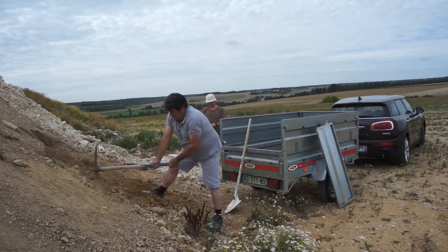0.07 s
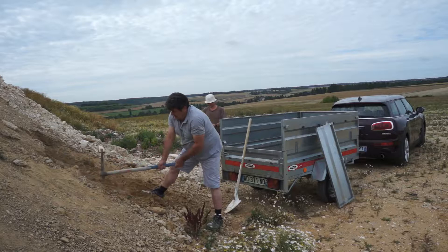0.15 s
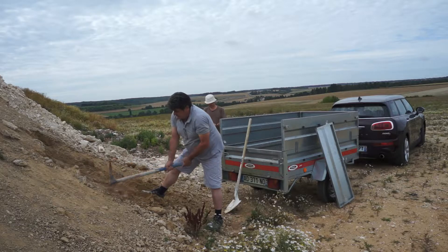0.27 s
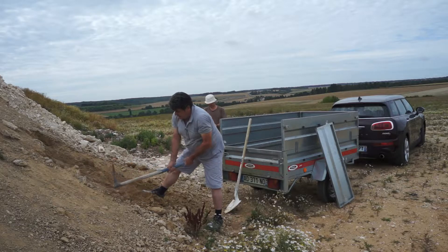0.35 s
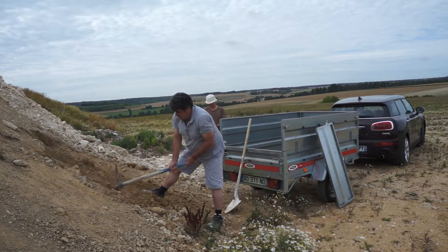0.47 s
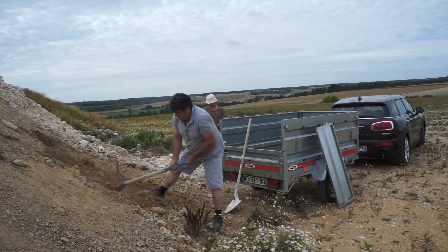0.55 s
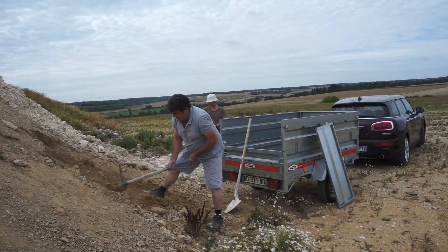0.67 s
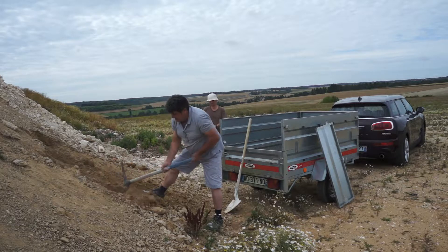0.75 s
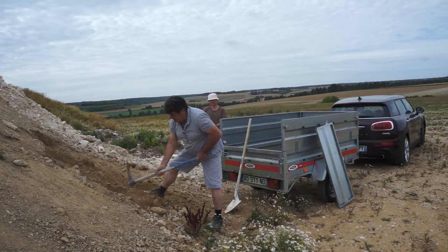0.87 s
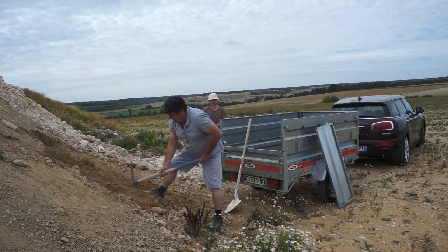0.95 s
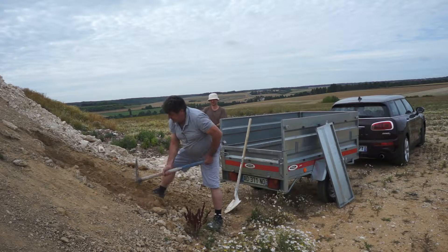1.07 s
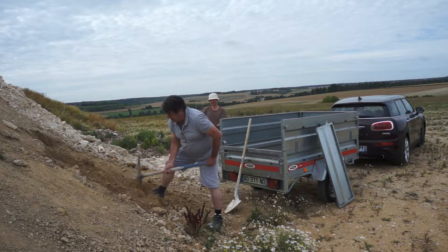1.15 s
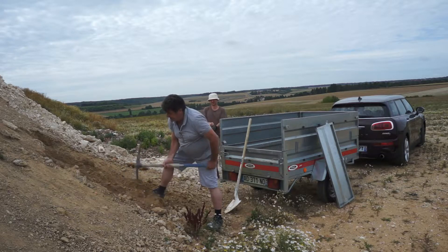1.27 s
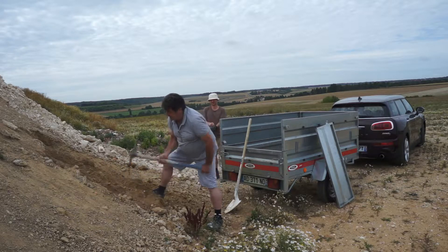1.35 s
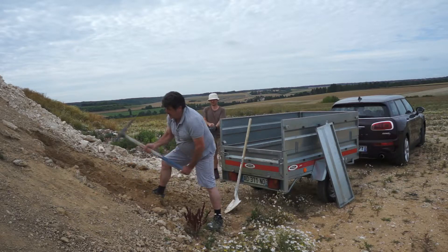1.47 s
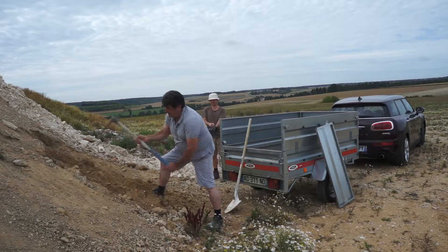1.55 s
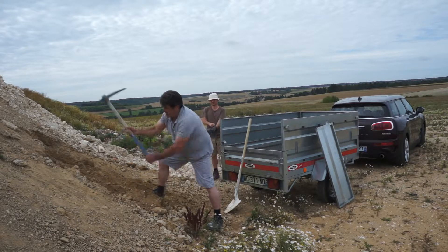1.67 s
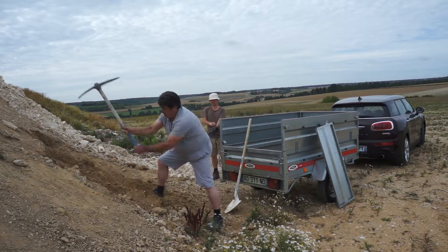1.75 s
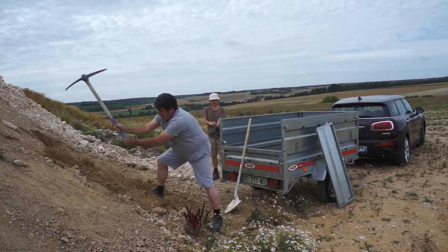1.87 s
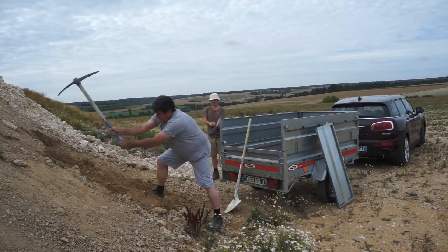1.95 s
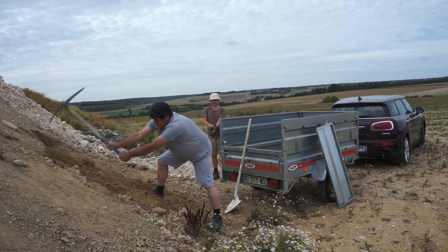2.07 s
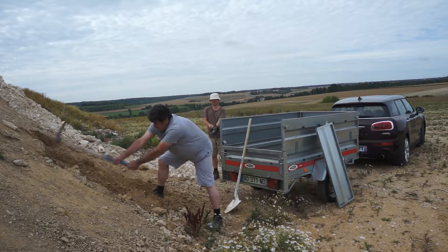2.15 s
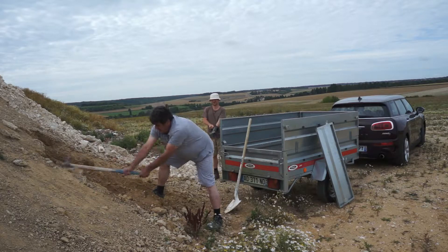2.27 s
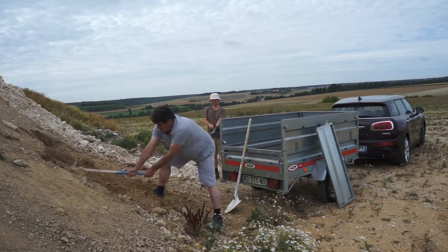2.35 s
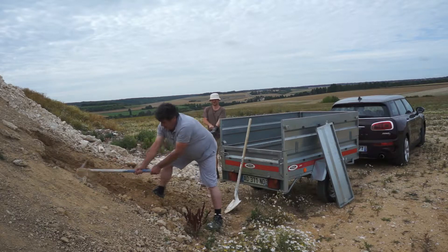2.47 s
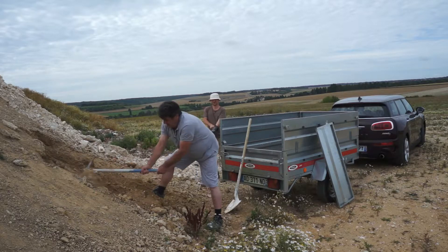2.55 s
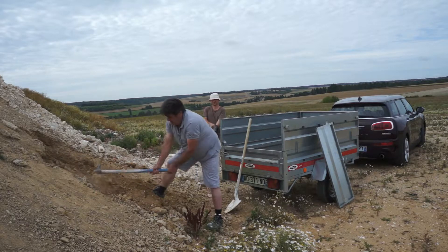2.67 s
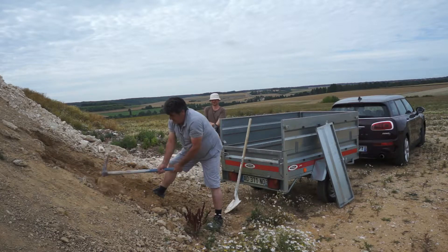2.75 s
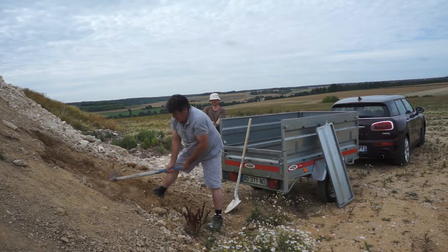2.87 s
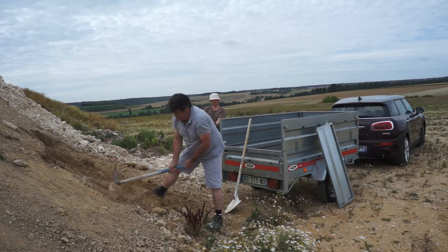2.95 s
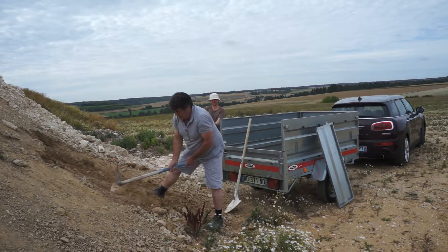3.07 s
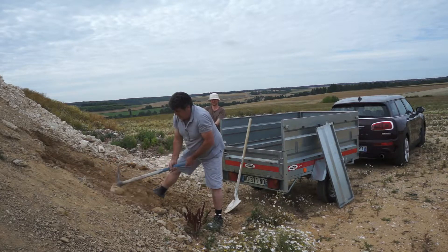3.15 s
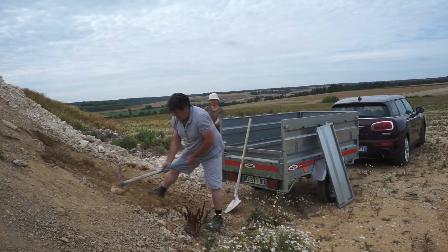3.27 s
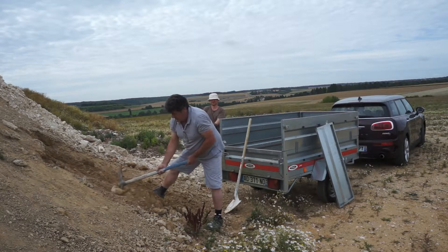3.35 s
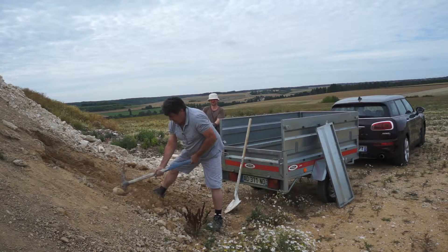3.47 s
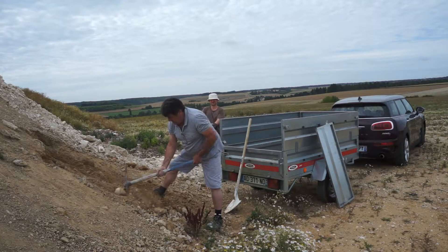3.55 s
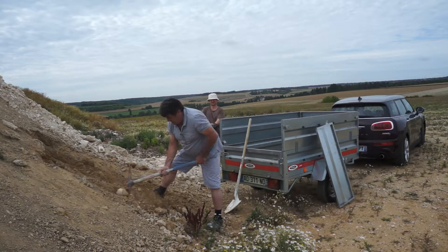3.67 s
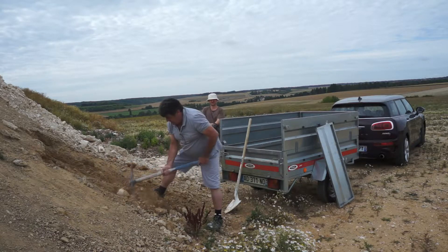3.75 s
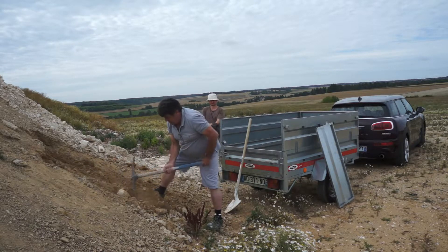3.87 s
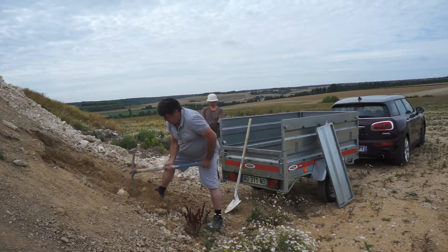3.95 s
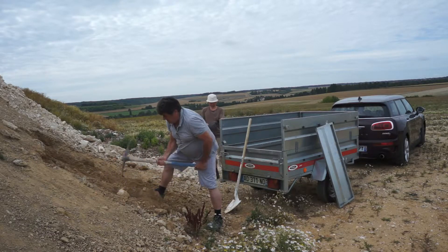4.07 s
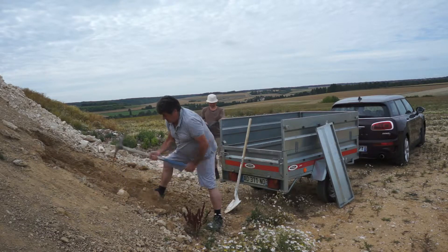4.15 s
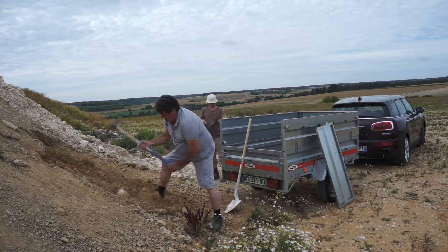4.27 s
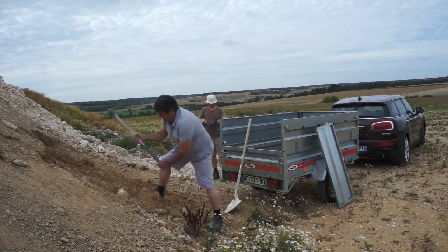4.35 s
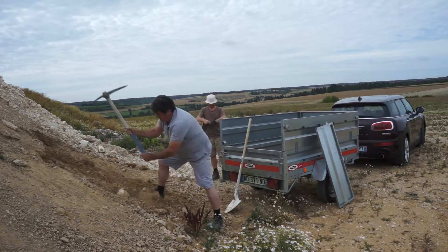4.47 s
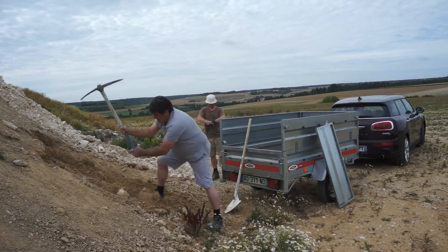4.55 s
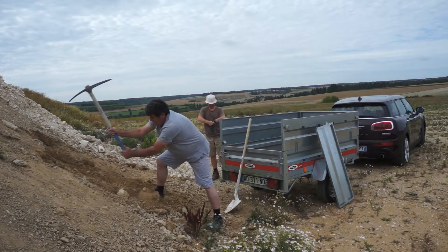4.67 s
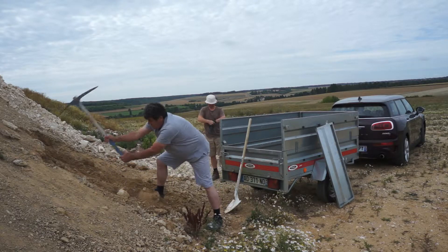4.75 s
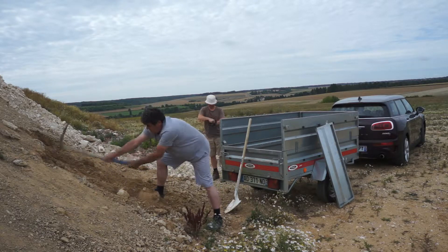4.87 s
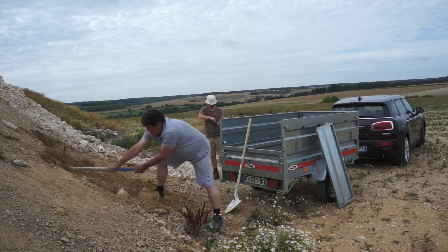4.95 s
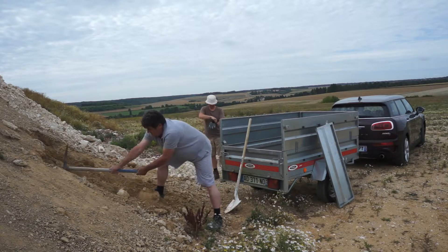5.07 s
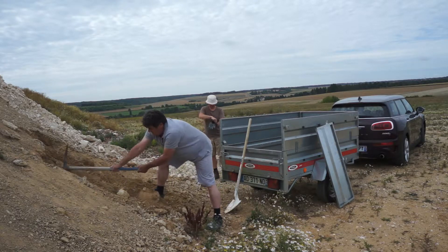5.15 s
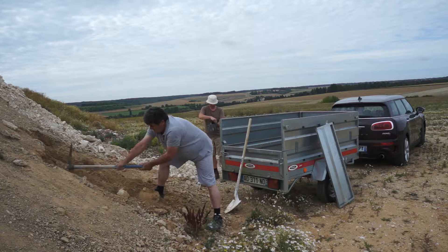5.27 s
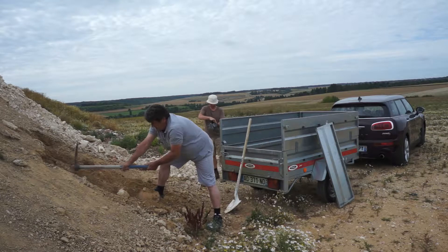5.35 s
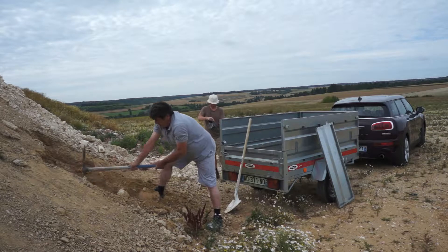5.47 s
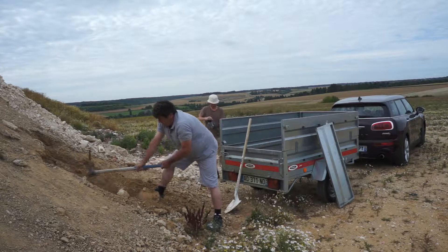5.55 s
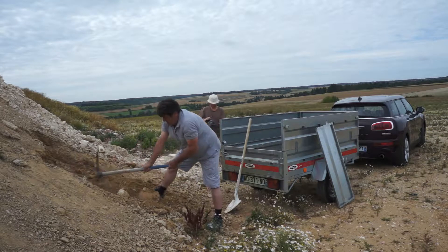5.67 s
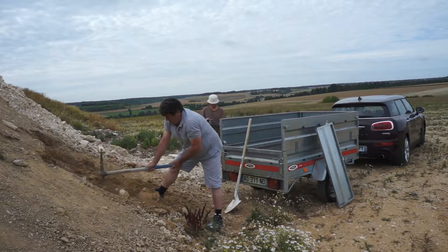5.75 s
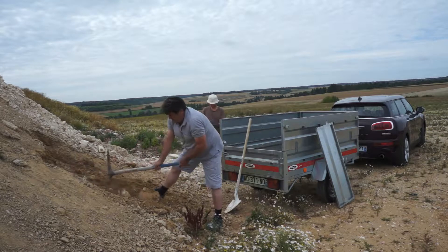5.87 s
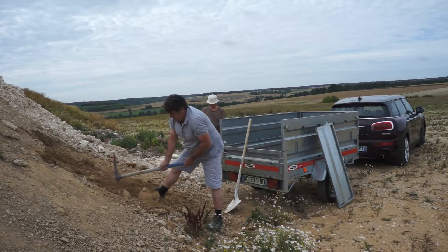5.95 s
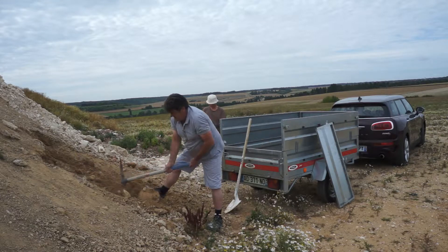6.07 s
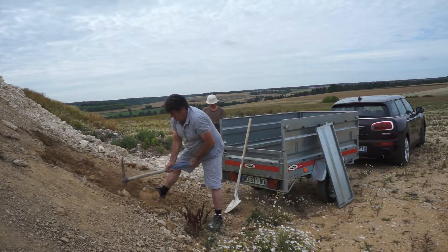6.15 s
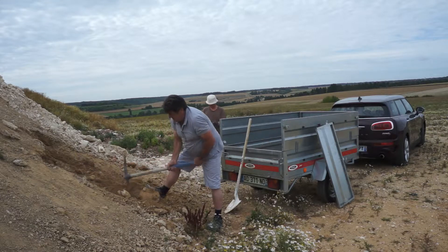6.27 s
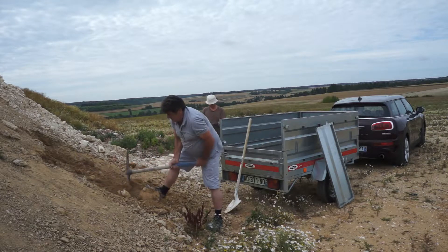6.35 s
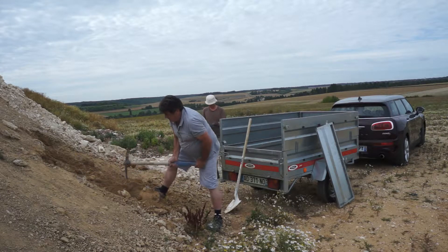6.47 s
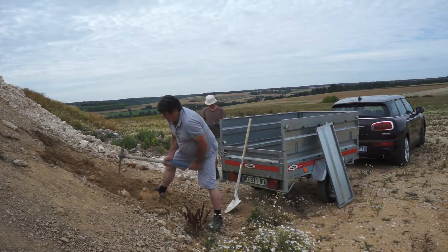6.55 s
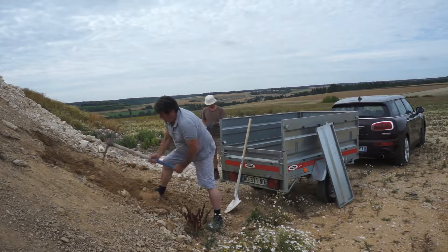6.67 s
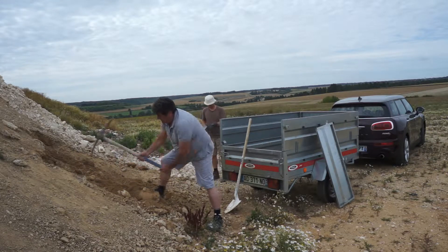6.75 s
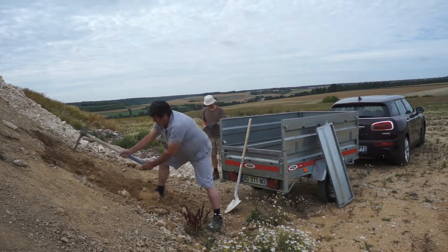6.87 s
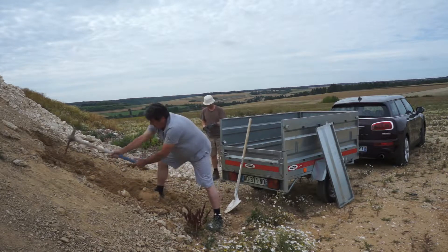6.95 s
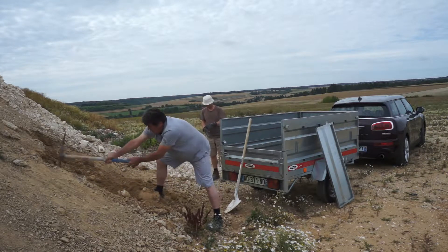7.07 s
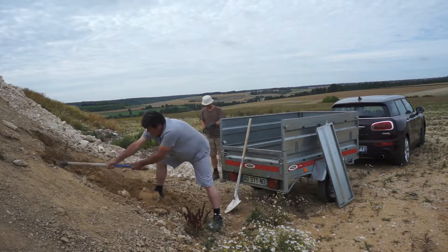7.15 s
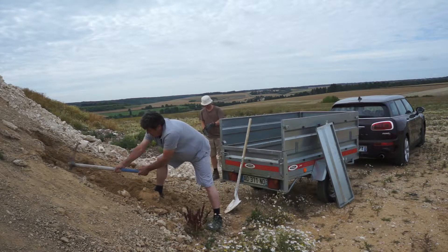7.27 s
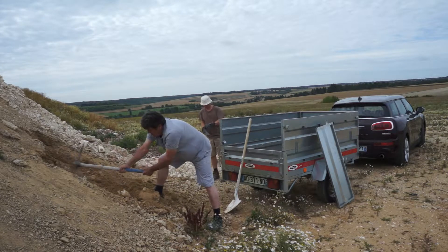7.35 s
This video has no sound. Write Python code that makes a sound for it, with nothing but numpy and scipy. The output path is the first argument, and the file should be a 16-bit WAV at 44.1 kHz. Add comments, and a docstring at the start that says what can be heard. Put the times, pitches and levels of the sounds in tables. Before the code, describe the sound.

Steel pick digging stony earth: gritty scrapes, sharp crunching strikes, clinks as it is levered free, low wind buffets and faint distant birds.

```python
"""Soil trickles, stones tick and a steel point scrapes gravel; then a pick hits a stony bank in open farmland.
Two blows are hard and one is light; between them the pick is levered free, clinking and dropping stones.
Ground sounds are filtered noise and grain impacts; the steel is a bank of decaying modes driven by the same forces.
Gusts (low noise) buffet the microphone; small birds (gliding sines) call far away over faint open air."""
import sys
import numpy as np
from scipy import signal
from scipy.fft import rfft, irfft
from scipy.io import wavfile
from scipy.ndimage import uniform_filter1d

SR = 44100
rng = np.random.default_rng(int(sys.argv[2]) if len(sys.argv) > 2 else 0)


def unload_wav(signal):
    """Save mono or channel-first audio to the path in sys.argv[1] as 16-bit WAV at rate SR, clipped to [-1, 1]."""
    wavfile.write(
        sys.argv[1],
        SR,
        np.round(np.clip(np.atleast_2d(signal).T, -1, 1) * 32767).astype(np.int16),
    )


N = 326340
TIME_S = np.arange(N) / SR

# blows: (time [s], crack [dB], thud [dB], crunch [dB], time to rest [s], stone hardness tilt [dB/octave],
#         steel ring re ground [dB])
BLOWS = [(2.2386, -24.5, -31, -38.3, 0.042, -1.2, -6), (4.9372, -25, -69, -39.3, .062, 6.5, -1),
         (7.0928, -62, -54, -58.5, 0.1, -4, 2)]
# pick modes: (frequency [Hz], t60 [s], level when the point bites [dB], level when knocked side-on [dB])
STEEL_MODES = [(612, 0.16, -16, 0.5), (983, 0.11, -10, -15), (1443, 0.076, 0.5, 4), (1988, 0.056, 2, -16),
               (2154, 0.049, 7.5, -9.5), (2557, 0.093, -4, 4.5), (2700, 0.033, 7.5, -34),
               (3980, 0.025, 10, -10), (4810, 0.064, -2, -12.5), (5500, 0.05, -3, -22),
               (7770, 0.044, 3, -20), (8000, 0.064, 6, -16), (9160, 0.02, 5.5, -16),
               (10784, 0.029, 6.5, -37)]
# breaking ground, relative spectrum: (frequency [Hz], density [dB/Hz])
EARTH = [(60, -41), (150, -6), (290, 3.5), (550, 1.5), (1200, -2), (2400, -2.5), (3400, -9), (5200, -9),
         (6300, -15.5), (9000, -9), (11000, -20)]
# shoved soil, filter: (frequency [Hz], gain [dB])
SHOVED_SOIL = [(30, -38), (120, -2), (280, 1), (600, 2)]
# head against stone: (time [s], peak [dB], contact cut-off [Hz])
CLINKS = [(.362, -50.5, 2500), (2.627, -49.5, 10000), (2.658, -41.5, 11300), (2.7267, -33, 12500),
          (2.775, -29, 3800), (5.3178, -50.5, 9500), (6.454, -46, 2010), (6.4758, -45, 1890),
          (6.4997, -55.5, 1820)]
# stones that snap or drop, and one narrow steel ping at the second blow:
# (time [s], level [dB], centre [Hz], spread [octaves])
TICKS = [(0.155, -53, 3330, 0.77), (.221, -52, 2600, 1), (1.348, -49.5, 5470, 0.75),
         (1.528, -53, 2050, 0.85), (2.077, -55, 2100, 0.36), (2.3705, -46.5, 850, 0.85),
         (2.7254, -44.5, 3500, 2), (2.8408, -45, 2510, 0.64), (2.9834, -53, 2500, 0.47),
         (3.8243, -54.5, 1490, 1.1), (3.878, -45.5, 1870, 0.75), (4.3226, -43.5, 4000, 0.67),
         (4.3507, -48, 3280, 0.82), (4.3668, -46, 4500, 0.61), (4.429, -43.5, 3540, 0.6),
         (4.938, -31.5, 3980, 0.11), (4.955, -43, 420, 0.47), (4.999, -41, 466, 0.82),
         (5.2535, -48.5, 2300, 0.83), (5.315, -49.5, 2540, 0.82), (5.5262, -52.5, 2900, 0.69),
         (5.7694, -50.5, 3020, 0.59), (5.7958, -43, 1680, 1.08), (6.234, -58, 555, 0.26),
         (6.4406, -43.5, 2340, 0.3), (6.531, -45.5, 750, 0.79), (6.604, -45, 1200, 0.69),
         (6.984, -52, 607, 0.96), (7.0929, -49, 1100, 0.79), (7.1006, -70, 480, 1)]
# point across a buried stone: (time of height [s], half length [s], level [dB], steel ring re ground [dB])
SKIDS = [(0.343, 0.018, -52, 11), (0.393, 0.01, -58, 7), (4.962, .005, -39, 2), (7.149, 0.01, -57, 10)]
# short rasps, broad ones of crushed stone, narrow ones of the steel ringing near 2 kHz:
# (time of height [s], half length [s], level [dB], centre [Hz], spread [octaves])
RASPS = [(2.283, 0.0057, -41.5, 2530, 0.57), (2.545, 0.0086, -48, 1620, 0.77),
         (2.746, .007, -49, 2700, 1.34), (4.986, .011, -42.5, 2060, 0.11),
         (5.082, 0.019, -58.5, 1870, 1.46), (6.361, 0.0087, -60, 3100, 0.54),
         (6.473, 0.0059, -53, 2020, 0.12)]
# point through gravel: (start [s], length [s], level before drag trim [dB], steel ring re ground [dB])
STROKES = [(0.164, 0.16, -59, 0), (0.318, 0.19, -62, -2), (0.598, 0.3, -68.5, -0.5),
           (2.579, 0.32, -60.5, -3), (2.848, 0.11, -57, 5), (3.582, 0.36, -63, -5),
           (5.296, 0.52, -63.5, -1), (6.0, 0.38, -65.5, 2), (6.95, 0.068, -63.5, -18)]
STROKE_ATTACK_S, STROKE_RELEASE_S = 0.014, 0.053
# gravel settling on the stopped point; level re crunch, before drag trim
SETTLE_DB, SETTLE_S = -22, 0.27
# scrape, filter: (frequency [Hz], gain [dB])
GRAVEL = [(200, -8.5), (700, -6.5), (2200, -4.5), (5000, 0.0), (10000, -13.5)]
# ground's changing grip on the steel: mode detuning as a fraction, corner of the grip's motion
GRIP_DETUNE, GRIP_SHIFT_HZ = .01, 45
# hand along the haft: (time of height [s], half length [s], hiss level [dB], resonance re hiss [dB])
LIFTS = [(1.798, 0.094, -53, -3.5), (4.558, 0.099, -56, -11.5)]
# palm on wood, relative spectrum: (frequency [Hz], density [dB/Hz])
HAFT = [(1000, -11.5), (3000, 2), (7000, 2), (11000, 2)]
# pick's resonance, loudest early in the slide
HAFT_HZ, HAFT_OCTAVES, HAFT_LEAD_S = 2650, 0.18, 0.026
# low airy whoosh around the second blow: (time of height [s], half length [s], level [dB], centre [Hz])
WHOOSH = (5, 0.35, -60.5, 210)
# loose soil back into the hole: (start [s], length [s], level at height [dB])
SPILLS = [(.05, .5, -70), (.5, .55, -63.5), (2.4, .75, -64), (2.9, .56, -60.5), (5.15, .65, -72),
          (5.95, .42, -65), (4.3, .22, -65)]
SPILL_SHAPE = 0.79  # power of each run's sine arch
# soil grains, relative spectrum: (frequency [Hz], density [dB/Hz])
SAND = [(500, 7.5), (1500, 4), (2700, 8), (4200, 9.5), (6000, 4), (9000, 12.5), (11000, 6)]
# gusts: (time of height [s], level before wind trim [dB], rise [s], fall [s])
GUSTS = [(0.599, -60, 0.033, 0.25), (.88, -60.5, 0.043, 0.036), (1.139, -41, 0.062, 0.072),
         (1.339, -51.5, 0.0085, 0.0063), (1.901, -37.5, 0.044, 0.084), (3.47, -57.5, 0.044, 0.11),
         (3.67, -52, 0.061, 0.057), (5.15, -51, 0.086, 0.03), (5.56, -38, 0.082, 0.12),
         (5.8, -58, 0.029, 0.27), (7.34, -66.5, 0.077, .15)]
GUST_SHAPE = 0.98  # 1 = pointed, 2 = rounded
BREEZE_DB = -77  # before wind trim
# turbulence, relative spectrum: (frequency [Hz], density [dB/Hz])
RUMBLE = [(20, -33), (50, -10.5), (110, 2), (200, 0), (290, -11.5), (400, -18.5), (600, -32.5), (1200, -83),
          (3000, -65)]
# turbulence that differs between ports, filter: (frequency [Hz], gain [dB])
FINE_SWIRLS = [(50, -19), (250, -5)]
# single eddies thumping the microphone: (time [s], peak [dB], frequency [Hz])
EDDIES = [(0.581, -46.5, 118), (1.086, -36, 179), (1.126, -27.5, 198), (1.886, -27, 222),
          (1.969, -33.5, 225), (2.055, -39, 165), (2.104, -47.5, 190), (3.657, -44, 243),
          (5.155, -40.5, 152), (5.564, -34, 165), (5.576, -25, 236), (5.709, -34.5, 180), (7.243, -52, 163)]
# bird notes: (start [s], length [s], start [Hz], middle [Hz], end [Hz], level before song trim [dB],
#              trill depth [0-1])
BIRDS = [(3.288, 0.13, 3480, 4150, 4210, -61, 0.53), (3.467, 0.17, 3130, 4100, 4140, -64.5, 0.34),
         (3.731, 0.13, 5530, 5620, 5130, -67.5, 0.6), (4.005, 0.04, 5800, 5240, 5090, -61, 0),
         (4.632, 0.035, 5020, 4980, 5060, -55.5, 0.1), (4.679, 0.056, 5980, 4500, 4250, -63.5, 0),
         (5.07, 0.13, 3050, 3030, 3160, -69, 1), (5.465, 0.11, 4110, 4160, 4260, -65.5, 0.5),
         (5.673, 0.041, 6000, 5060, 4050, -67, 0), (6.136, 0.048, 5450, 5360, 5200, -69.5, .2),
         (6.368, 0.073, 3140, 2940, 2870, -67.5, 0.1), (6.7, 0.065, 4900, 4770, 4720, -68, 0),
         (6.721, 0.31, 1665, 1644, 1653, -72, 0.5), (6.814, 0.07, 4060, 3930, 3870, -67.5, 0)]
# open air, relative spectrum: (frequency [Hz], density [dB/Hz])
AIR = [(18, -51), (30, -11), (65, -13.5), (153, -6), (338, -10), (1860, -12.5), (2440, -13.5),
       (4870, -16.5), (9250, -20.5), (11000, -23.5), (14300, -102), (22000, -120)]
AIR_DB = -66.6
# open air: (frequency [Hz], left-right likeness [0-1])
AIR_SAME = [(100, 1), (300, 1), (600, 0.58), (2500, 0.57), (5400, 0.61), (11000, 0.36)]
# ports, sound from the bank: (frequency [Hz], phase by which left leads [rad])
PORT_PHASE = [(100, 0), (2100, .1), (3100, .5), (3800, 1.55), (5300, 1.25), (7000, 1.8), (8000, 3.8),
              (11000, 4.6)]
# ports, sound from the bank: (frequency [Hz], left minus right [dB])
PORT_BALANCE = [(200, -0.5), (1100, 2.5), (2200, 1.5), (3300, -5), (4150, 1), (5600, 1.5), (7600, -9),
                (8800, 2.5), (11000, 4.5)]
EDGE_HZ = 11150


def amp(db):
    """Decibels to gain."""
    return 10 ** (np.asarray(db) / 20)


def unit(x):
    """Scales to rms 1."""
    return x / np.sqrt(np.mean(x ** 2) + 1e-20)


def read(points, hz):
    """Table value on a log-frequency axis."""
    f, value = np.transpose(points)
    return np.interp(np.log(hz + 1), np.log(f + 1), value)


def add(mix, s, sound):
    """Mixes a sound in at time s."""
    part = mix[max(round(s * SR), 0):][:len(sound)]
    part += sound[:len(part)]


def colour(x, db_at):
    """Minimum-phase filter with gain db_at(Hz), floored at -100 dB."""
    hz = abs(np.fft.fftfreq(4096, 1 / SR))
    log_gain = np.log(amp(np.maximum(db_at(hz), -100)))
    taps = np.fft.ifft(np.exp(np.conj(signal.hilbert(log_gain)))).real
    return signal.fftconvolve(x, taps[:len(taps) // 2])[:len(x)]


def hump_db(hz, centre_hz, octaves, slope_db=20):
    """Gain of one broad resonance, flat-topped on a log-frequency axis."""
    distance = np.log2((hz + 1) / centre_hz) / octaves
    return -slope_db * np.log10(1 + distance ** 4 / 2)


def band(centre_hz, octaves):
    """Noise of rms 1 in one resonance."""
    return unit(colour(rng.standard_normal(N), lambda hz: hump_db(hz, centre_hz, octaves)))


def bell(s, half_s):
    """Smooth swell of height 1 around time s."""
    return np.exp(-((TIME_S - s) / half_s) ** 2)


def wander(rate_hz, size):
    """Random motion of rms 1, low-passed at rate_hz."""
    hz = np.fft.rfftfreq(size, 1 / SR)
    spectrum = rfft(rng.standard_normal(size)) / (1 + (hz / rate_hz) ** 4)
    return unit(irfft(spectrum, size))


def grit(per_s, spread_db, size):
    """Random grain impacts of rms 1: many small, a few large."""
    heights = amp(spread_db * np.minimum(rng.exponential(1, size), 4))
    hits = rng.random(size) < per_s / SR
    return unit(heights * rng.choice([-1, 1], size) * hits)


def ring(side_on, detune=0):
    """The pick's answer to one tap, energy 1; ground pressing on the head pulls each mode off its note."""
    t = TIME_S[:SR // 5]
    pulls = 1 + detune * rng.uniform(-1.24, 1, len(STEEL_MODES))
    modes = np.zeros(len(t))
    for (hz, t60_s, bite_db, knock_db), pull in zip(STEEL_MODES, pulls):
        db = knock_db if side_on else bite_db
        modes += amp(db - 60 * t / t60_s) * np.sin(2 * np.pi * hz * pull * t)
    return modes / np.linalg.norm(modes)


def dig(force, steel_db, side_on_db):
    """Force at the point sounds through breaking ground and through steel whose notes shift with the grip."""
    ground = unit(colour(force, lambda hz: read(EARTH, hz)))
    steel, sideways = 0, amp(side_on_db) * ring(side_on=True)
    for _ in range(3):  # three detuned copies, each fading in and out with its own grip
        grip = wander(GRIP_SHIFT_HZ, size=len(force))
        answer = ring(side_on=False, detune=GRIP_DETUNE) + sideways
        steel = steel + signal.fftconvolve(force * grip, answer)[:len(force)]
    return (ground + amp(steel_db) * unit(steel)) * np.std(force)


def blows(crack_s=0.003, crumble_s=0.021, thud_hz=560, thud_s=0.0029, sag_s=0.13, clods_db=2.0,
          crunch_hardness=0.18):
    """The point cracks the crust, shoves the soil, and crunches through clods until it stops and they crumble."""
    out, t = np.zeros(N), TIME_S[:SR // 3]
    for s, crack_db, thud_db, crunch_db, rest_s, tilt_db, steel_db in BLOWS:
        # contact area grows as the point enters
        bite = 1 - np.exp(-t / 0.00013)
        crack = amp(crack_db) * np.exp(-t / crack_s) * rng.choice([-1, 1], len(t))
        travel = np.exp(-t / sag_s) * np.exp(-np.maximum(t - rest_s, 0) / crumble_s)
        grains = grit(3000, 3.6, size=len(t))
        clods = unit(amp(clods_db * wander(106, size=len(t))))
        crunch = amp(crunch_db) * travel * grains * clods
        # stone hardness tilts the crack much more than the crunch behind it
        for force, share in (crack, 1), (crunch, crunch_hardness):
            sound = dig(bite * force, steel_db, side_on_db=-50)
            add(out, s, colour(sound, lambda hz: share * tilt_db * np.log2((hz + 200) / 2700)))
        shove = -np.sin(2 * np.pi * thud_hz * t) + .5 * wander(680, size=len(t))
        thud = amp(thud_db) * shove * np.exp(-t / thud_s) * 2 * bite
        add(out, s, colour(thud, lambda hz: read(SHOVED_SOIL, hz)))
    return out


def clinks(rub=0.024, rub_s=0.027):
    """Side-on knocks let the head ring freely; a softer contact gives a duller note."""
    out, note = np.zeros(N), ring(side_on=True)
    t = TIME_S[:len(note)]
    for s, db, cut_hz in CLINKS:
        force = rub * rng.standard_normal(len(t)) * np.exp(-t / rub_s)
        force[0] += 1
        low_hz = cut_hz ** 2 / 42000  # harder contacts lose bass too

        def contact_db(hz):
            """Contact stiffness as a band-pass gain."""
            return -10 * np.log10((1 + (hz / cut_hz) ** 4) * (1 + (low_hz / (hz + 1)) ** 4))
        tone = signal.fftconvolve(colour(force, contact_db), note)
        add(out, s, amp(db) * tone / abs(tone).max())
    return out


def skids():
    """The point skids across a buried stone: a short, gritty zing of the steel."""
    out, t = np.zeros(N), TIME_S[:SR // 8] - 1 / 25
    for s, half_s, db, steel_db in SKIDS:
        force = np.exp(-(t / half_s) ** 2) * grit(6000, 2, size=len(t))
        zing = unit(dig(force, steel_db, side_on_db=-6.5))
        add(out, s + t[0], amp(db) * np.std(force) * zing)
    return out


def scrape(pressure, steel_db, slips_db=2):
    """The point sticks and slips over gravel, which keeps the steel singing."""
    slips = amp(slips_db * wander(35, size=len(pressure)))
    force = pressure * grit(2500, 2.7, size=len(pressure)) * slips
    sound = dig(force, steel_db, side_on_db=-11)
    return colour(sound, lambda hz: read(GRAVEL, hz))


def drag(trim_db=-0.5, settle_steel_db=-2):
    """Each stroke leans on the point, holds and lets go; gravel also settles after every blow."""
    out, t = np.zeros(N), TIME_S[:SR]
    for s, length_s, db, steel_db in STROKES:
        lean = np.minimum(t / STROKE_ATTACK_S, 1)
        release = np.exp(-np.maximum(t - length_s, 0) / STROKE_RELEASE_S)
        add(out, s, scrape(amp(db) * lean * release, steel_db))
    for s, _, _, crunch_db, rest_s, _, _ in BLOWS:
        pressure = amp(crunch_db + SETTLE_DB) * np.exp(-t / SETTLE_S)
        add(out, s + rest_s, scrape(pressure, settle_steel_db))
    return amp(trim_db) * out


def rasps():
    """Short, dense grain noise: broad rasps of crushed stone, narrow ones of the steel ringing near 2 kHz."""
    out, t = np.zeros(N), TIME_S[:SR // 8] - 1 / 25
    for s, half_s, db, centre_hz, octaves in RASPS:
        grains = colour(grit(4000, 3, size=len(t)), lambda hz: hump_db(hz, centre_hz, octaves))
        add(out, s + t[0], amp(db) * np.exp(-(t / half_s) ** 2) * unit(grains))
    return out


def ticks(chatter=0.11, decay_s=0.0041, swell=0.36, swell_s=0.0026):
    """Each stone or ping ticks out of a very brief swell of soft noise and chatters, in a band of its own."""
    out, t = np.zeros(N), (np.arange(SR // 10) - SR // 80) / SR
    for s, db, centre_hz, octaves in TICKS:
        envelope = np.where(t < 0, swell * np.exp(-abs(t) / swell_s), np.exp(-abs(t) / decay_s))
        force = chatter * envelope * rng.standard_normal(len(t)) + 2 * (t == 0)
        tick = colour(force, lambda hz: hump_db(hz, centre_hz, octaves, slope_db=14))
        loudest = np.sqrt(uniform_filter1d(tick ** 2, size=88).max())  # 2 ms rms
        add(out, s + t[0], amp(db) * tick / loudest)
    return out


def trickle():
    """Fine grains of dry soil run back into the hole; each run swells and dies away."""
    flow = np.zeros(N)
    for s, length_s, db in SPILLS:
        arch = abs(np.sin(np.pi * np.clip((TIME_S - s) / length_s, 0, 1)))
        flow += amp(db) * arch ** SPILL_SHAPE
    return flow * unit(colour(grit(6000, 4.0, size=N), lambda hz: read(SAND, hz)))


def lifts():
    """A hand slides along the haft as the pick is lifted: palm hiss plus the pick's resonance."""
    hiss = unit(colour(rng.standard_normal(N), lambda hz: read(HAFT, hz)))
    note = band(HAFT_HZ, HAFT_OCTAVES)
    slides = np.zeros(N)
    for s, half_s, db, note_db in LIFTS:
        resonance = amp(note_db) * note * bell(s - HAFT_LEAD_S, 0.58 * half_s)
        slides += amp(db) * (hiss * bell(s, half_s) + resonance)
    return slides


def whoosh():
    """A low airy whoosh around the second blow: band noise under a smooth swell."""
    s, half_s, db, centre_hz = WHOOSH
    return amp(db) * bell(s, half_s) * band(centre_hz, 0.59)


def gusts():
    """Strength of the wind: gusts build and fade over a light breeze, and their powers sum."""
    t = TIME_S[::64]
    power = amp(BREEZE_DB) ** 2
    for s, db, rise_s, fall_s in GUSTS:
        away = np.maximum((s - t) / rise_s, (t - s) / fall_s)
        power = power + (amp(db) * np.exp(-abs(away) ** GUST_SHAPE)) ** 2
    return np.interp(TIME_S, t, np.sqrt(power))


def turbulence():
    """One stream of low, rumbling noise, rms 1."""
    return unit(colour(rng.standard_normal(N), lambda hz: read(RUMBLE, hz)))


def wind(lumps_db=3.5, trim_db=-1):
    """Lumpy turbulence at the ports plus single eddies; mainly the finer swirls differ between ports."""
    gust = gusts() * unit(amp(lumps_db * wander(53, size=N))) * amp(trim_db)
    shared = gust * turbulence()
    apart = gust * colour(turbulence(), lambda hz: read(FINE_SWIRLS, hz))
    t = TIME_S[:SR // 25] - 1 / 50
    for s, db, hz in EDDIES:
        thump = -np.cos(2 * np.pi * hz * t) * np.exp(-(t * hz / 0.58) ** 2)
        add(shared, s + t[0], amp(db) * thump)
    return np.array([shared + apart, shared - apart])


def birds(trill_hz=55, trim_db=-3):
    """Thin gliding whistles, some of them trilled, fluttering a little over the distance."""
    out = np.zeros(N)
    for s, length_s, start_hz, middle_hz, end_hz, db, depth in BIRDS:
        u = np.linspace(0, 1, int(length_s * SR))
        trill = depth * np.sin(2 * np.pi * trill_hz * length_s * u)
        glide_hz = np.polyval(np.polyfit([0, .5, 1], [start_hz, middle_hz, end_hz], 2), u)
        hz = glide_hz * (1 + .025 * trill + .012 * wander(300, size=SR)[:len(u)])
        flutter = amp(2 * wander(70, size=SR)[:len(u)])
        swell = np.sqrt(u * abs(np.sin(np.pi * u))) * (1 + trill) * flutter
        whistle = unit(swell * np.sin(2 * np.pi * np.cumsum(hz) / SR))
        add(out, s, amp(db + trim_db) * whistle)
    return out


def air():
    """The faint hush of open fields, mono in the bass, its level drifting slightly."""
    hz = np.fft.rfftfreq(N, 1 / SR)
    a, b = rfft(rng.standard_normal((2, N))) * amp(read(AIR, hz))
    same = np.clip(read(AIR_SAME, hz), -1, 1)
    hush = unit(irfft([a, same * a + np.sqrt(1 - same ** 2) * b], N))
    return amp(AIR_DB) * hush * amp(.4 * wander(1, size=N))


def scatter(x, t60_s):
    """Weak diffuse returns from the bank and the trailer: sparse random echoes, different at each port."""
    t = TIME_S[:SR // 2]
    signs = rng.choice([-1, 1], (2, len(t)))
    hits = rng.random((2, len(t))) < 2000 / SR
    taps = signs * hits * amp(-60 * t / t60_s) * (t > .003)
    return signal.fftconvolve(x[None], taps / np.linalg.norm(taps[0]), axes=1)[:, :N]


def ports(x):
    """Sound from the left reaches the two microphone ports with different phase and level."""
    hz = np.fft.rfftfreq(N, 1 / SR)
    half = amp(read(PORT_BALANCE, hz) / 2) * np.exp(.5j * read(PORT_PHASE, hz))
    return irfft(rfft(x) * np.array([half, 1 / half]), N)


def scene():
    """The digging to the left, with birds, wind and open air around it."""
    work = blows() + clinks() + skids() + drag() + rasps() + ticks() + trickle() + lifts() + whoosh()
    song = birds()
    digging = ports(work) + amp(-11.5) * scatter(work, t60_s=0.13)
    calls = song + amp(-5.5) * scatter(song, t60_s=0.12)
    return digging + calls + wind() + air()


def record(dry):
    """The recorder's steep band limit: a linear-phase low-pass."""
    low_pass = signal.firwin(511, EDGE_HZ, window=("kaiser", 8), fs=SR)
    return signal.oaconvolve(dry, low_pass[None], "same")


dry = scene()
out = record(dry)
unload_wav(out)
```